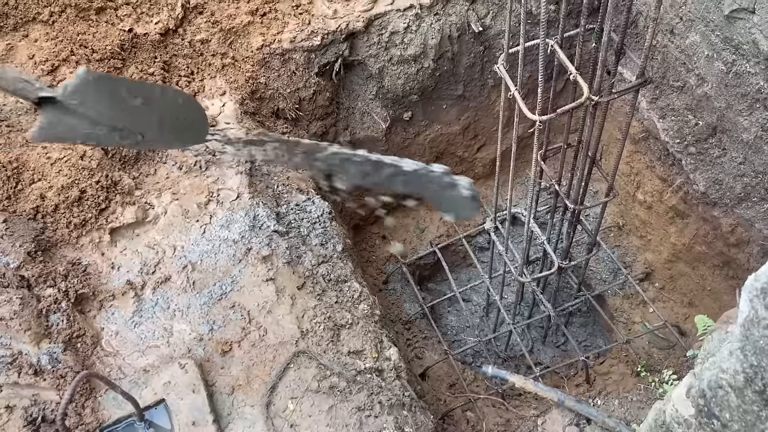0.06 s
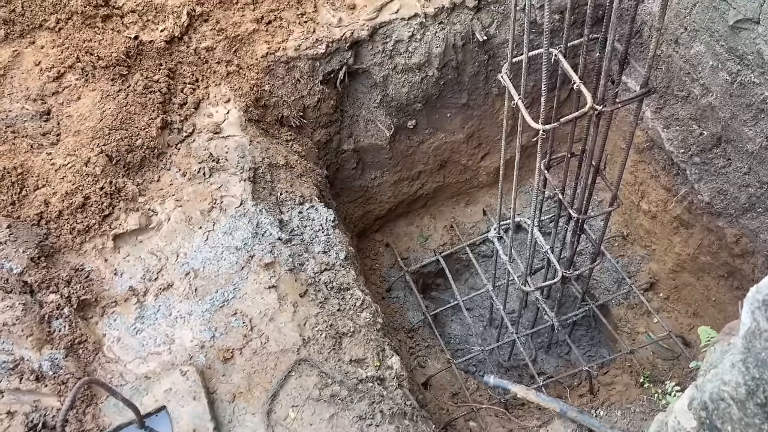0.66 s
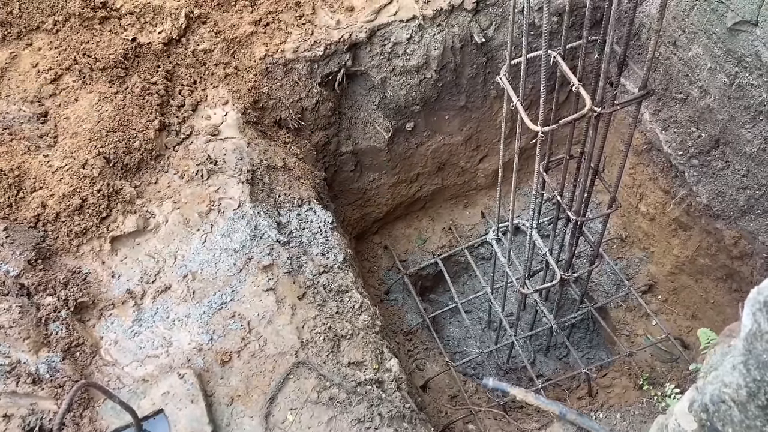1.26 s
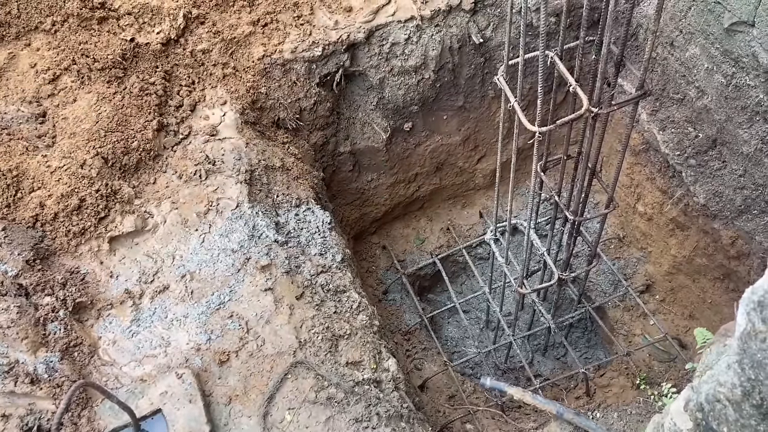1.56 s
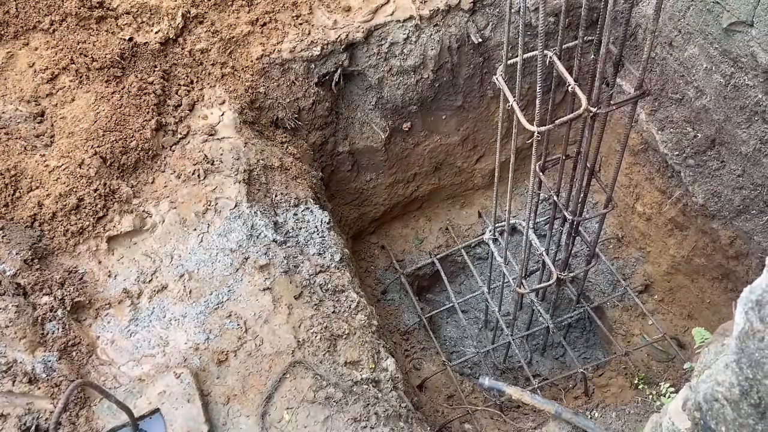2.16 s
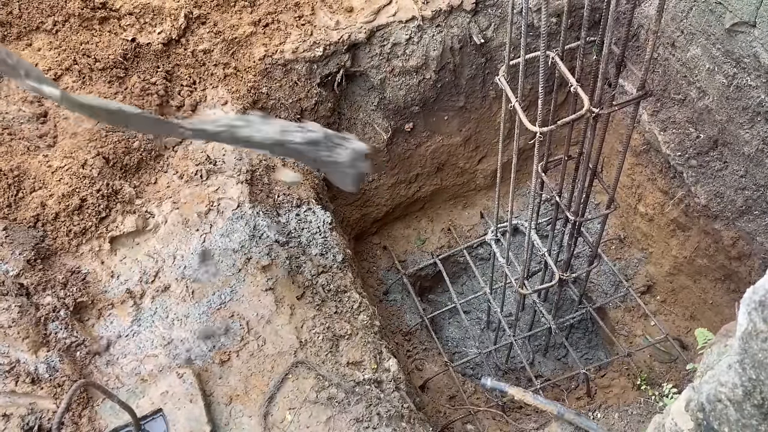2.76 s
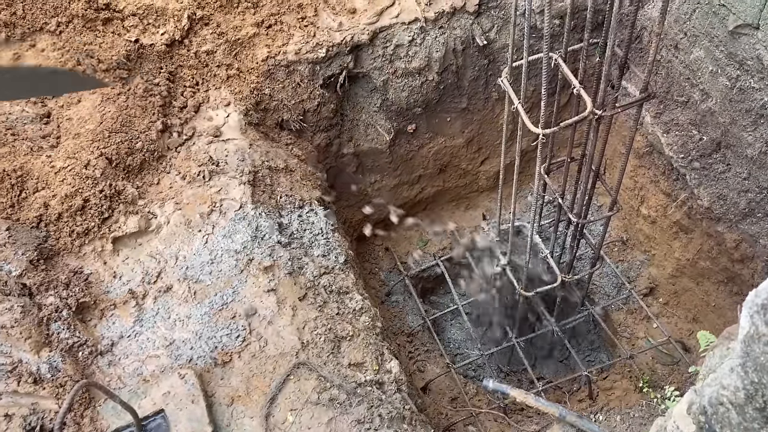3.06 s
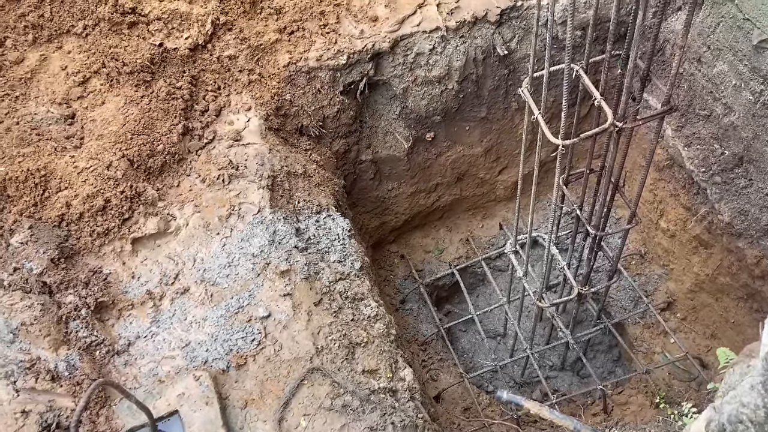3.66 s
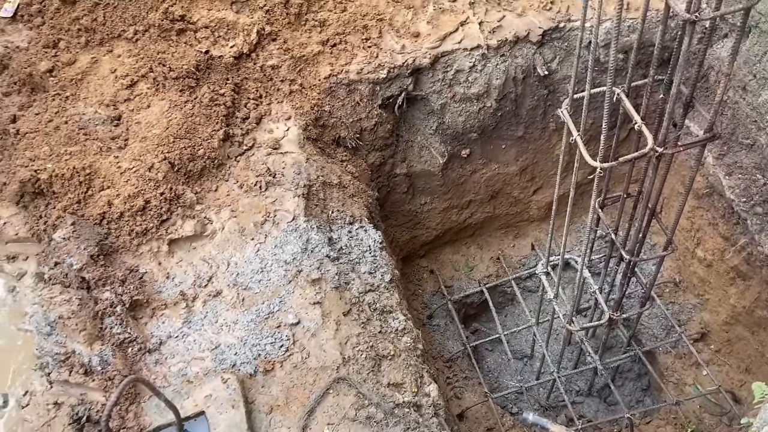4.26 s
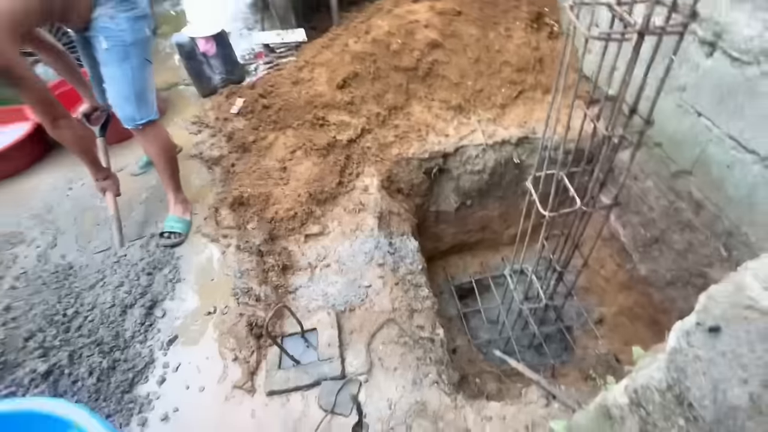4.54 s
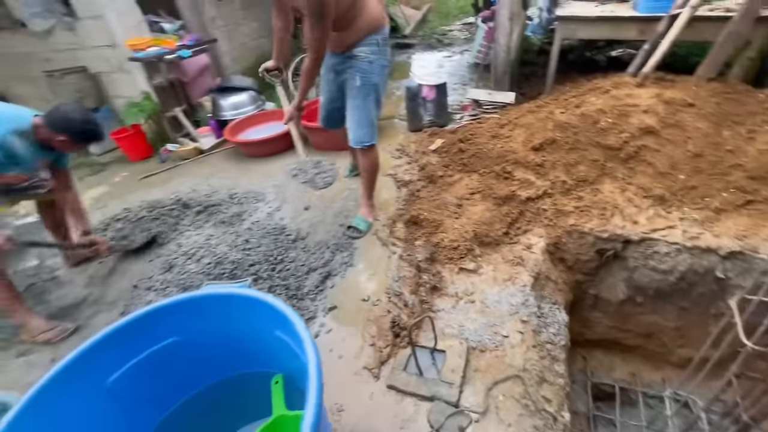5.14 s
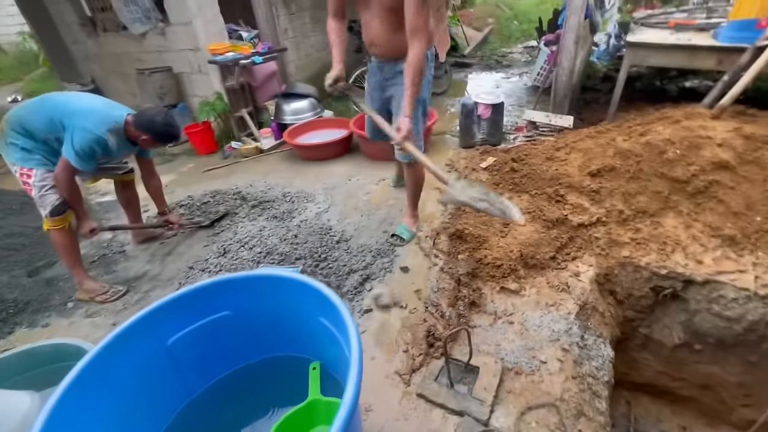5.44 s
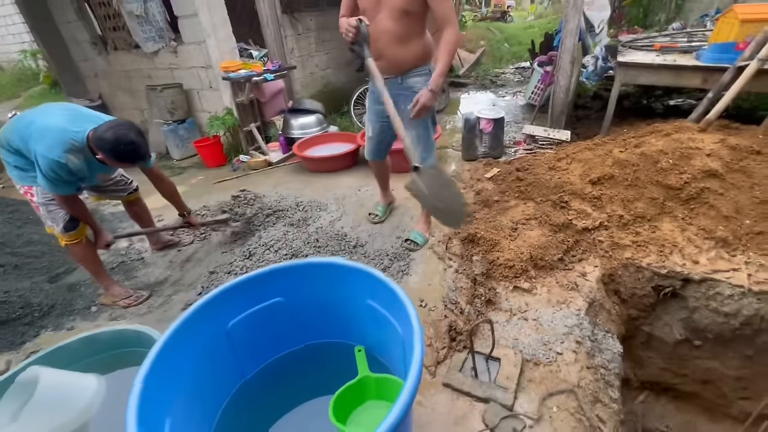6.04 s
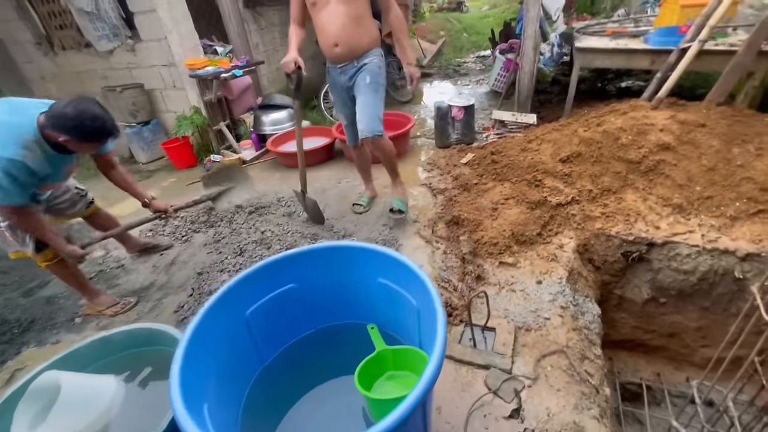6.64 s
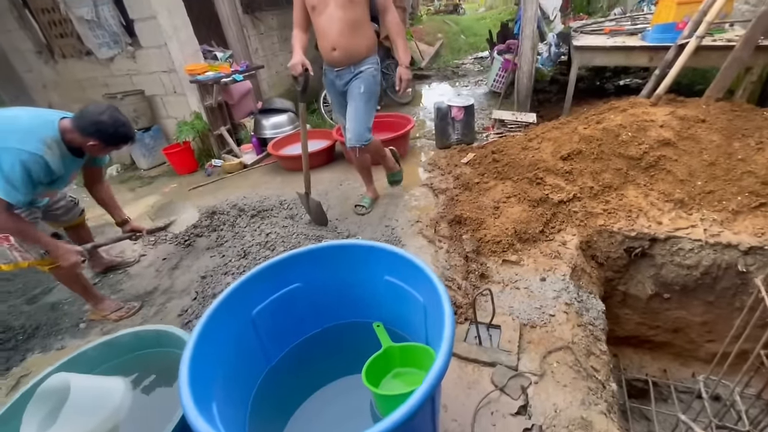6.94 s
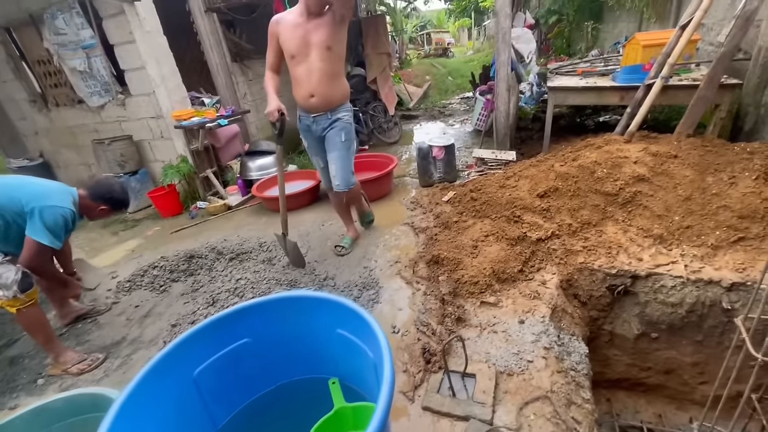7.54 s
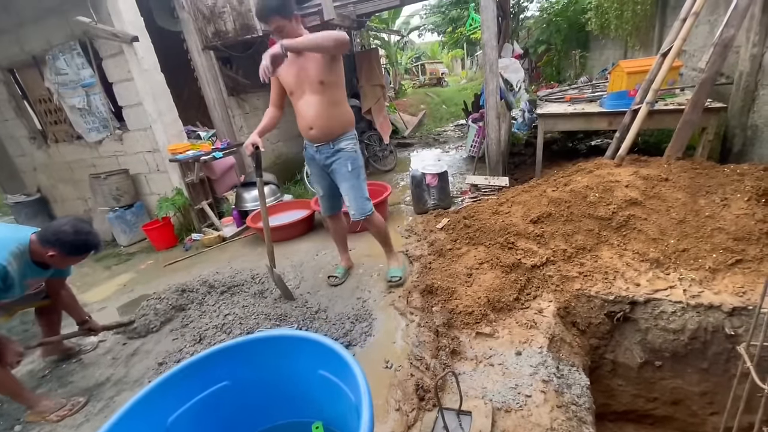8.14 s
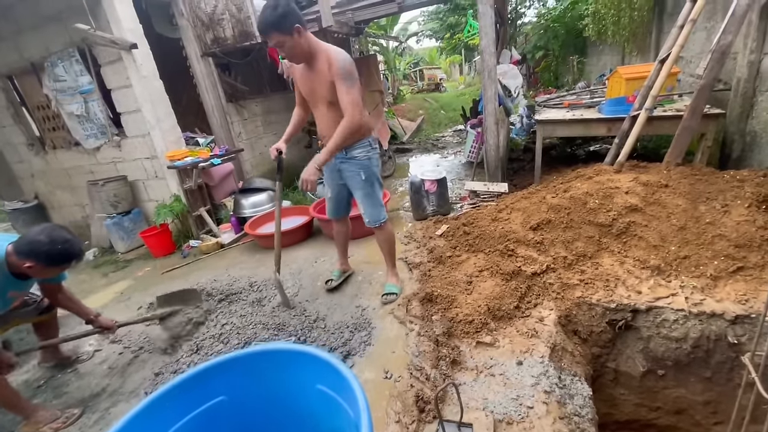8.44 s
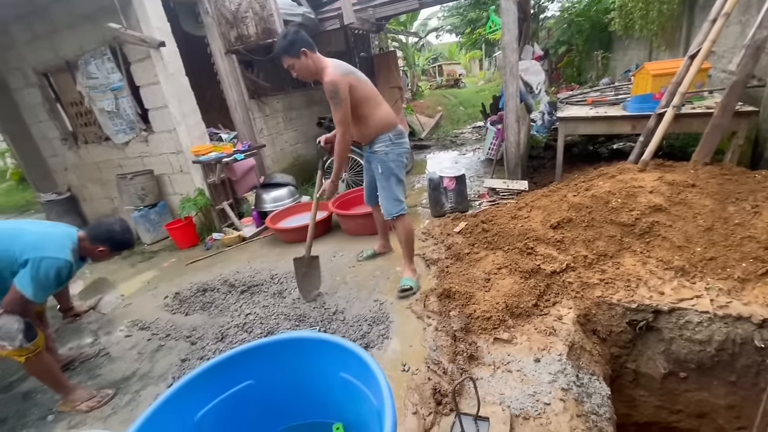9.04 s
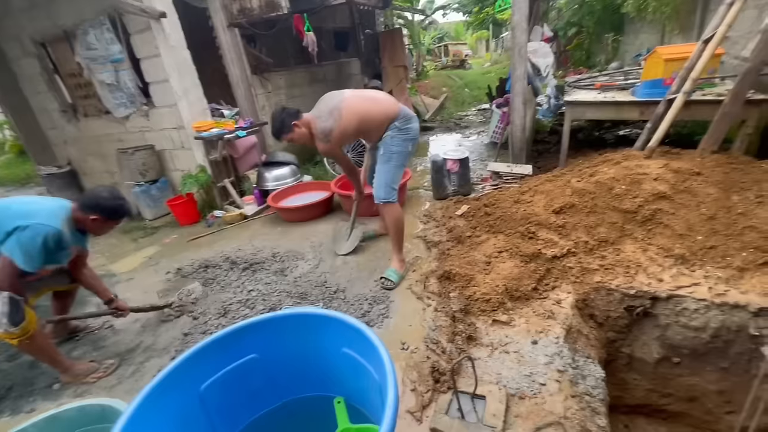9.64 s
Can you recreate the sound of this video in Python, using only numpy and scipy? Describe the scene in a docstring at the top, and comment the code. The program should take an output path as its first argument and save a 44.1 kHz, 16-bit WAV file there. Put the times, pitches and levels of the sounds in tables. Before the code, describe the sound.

Two steel shovels bite and grind through wet gravel concrete on a slab, mostly to the left, the blades ringing with grit. A load splatters into a pit at the start, another follows a few scoops later, and a softer one lands past the middle, each with a thud and pattering stones. More scraping and sharp chinks follow. The quiet walled yard adds a short echo and a faint low rumble.

```python
"""A quiet walled yard: two workers shovel wet gravel concrete on a slab, off to the left.
Steel blades bite and grind under the heap; catching grit rings the steel, and the mix slumps behind.
Loads are flung into a footing pit, where they thud, patter and spray; loose stones tick in between.
The walls answer each sound with a short tail, over a low rumble, faint air and two far whistles."""
import sys
import numpy as np
from scipy import signal
from scipy.fft import rfft, irfft, next_fast_len
from scipy.io import wavfile
from scipy.ndimage import uniform_filter1d, map_coordinates

SR = 44100
rng = np.random.default_rng(int(sys.argv[2]) if len(sys.argv) > 2 else 0)


def dump(signal):
    """Clip the signal to [-1, 1] and save it as 16-bit WAV at the path in sys.argv[1]."""
    limited = np.clip(np.atleast_2d(signal).T, -1, 1)
    pcm = np.round(limited * 32767).astype(np.int16)
    wavfile.write(sys.argv[1], SR, pcm)


N = 432180
THUD_HZ, LOW_HZ, MID_HZ, HIGH_HZ, TOP_HZ = 40, 250, 1100, 4200, 15850  # band edges

# steel resonances of the two shovels: (pitch [Hz], width [Hz], level [dB])
FILLING_BLADE = [(565, 146, -3), (790, 87, -2), (1054, 35, -6), (1225, 110, -8), (1640, 45, -3.5),
                 (2030, 83, -0.5), (2380, 59, -7), (2625, 90, -6.5), (3120, 69, -9), (3590, 48, -4)]
MIXING_BLADE = [(450, 197, 5.5), (790, 70, 1), (990, 100, -5.5), (1584, 69, 0.5), (1720, 85, 2.5),
                (1870, 68, -4), (3100, 320, -0.5), (3900, 64, -7), (5510, 200, -1.5), (6100, 100, -4),
                (6820, 170, 3)]
# tone of the grit rubbing on each shovel: (frequency [Hz], level [dB])
FILLING_COLOUR = [(100, -8.5), (150, -5), (220, -2), (320, -4.5), (410, -3), (560, 2), (1000, -1.5),
                  (1450, -0.5), (2000, 1), (2700, -2), (4500, -7), (7000, -6.5), (8500, -5), (16000, -11)]
MIXING_COLOUR = [(100, 0), (140, -4.5), (200, -5.5), (310, -4.5), (500, -2.5), (1200, -2), (1700, 0),
                 (3200, -2), (4300, -4), (6000, -1.5), (8500, -9), (11300, -11), (13000, -25)]


def amp(db):
    """Decibels to gain."""
    return 10 ** (np.asarray(db) / 20)


def along(points, hz):
    """Read a (frequency, value) curve on a log axis."""
    knots_hz, values = np.transpose(points)
    return np.interp(np.log(hz + 1), np.log(knots_hz + 1), values)


def wobble(n, rate):
    """A smooth random curve, rate knots a second."""
    return map_coordinates(rng.standard_normal(int(n * rate / SR) + 4), [np.arange(n) * rate / SR])


def filtered(x, response):
    """Shape x with a complex frequency response."""
    n = x.shape[-1]
    size = next_fast_len(n + 8192)
    return irfft(rfft(x, size) * response(np.fft.rfftfreq(size, 1 / SR)), size)[..., :n]


def band(x, lo, hi, order=4):
    """Causal band-pass."""
    return signal.sosfilt(signal.butter(order, [lo, min(hi, TOP_HZ)], "band", fs=SR, output="sos"), x)


def level_band(pair, lo, hi):
    """One band of a stereo texture, levelled so that its centre below 9 kHz holds rms 1."""
    part = band(pair, lo, hi)
    centre = filtered(part.mean(0), lambda hz: hz < 9000)
    return part / np.sqrt(np.abs(uniform_filter1d(centre ** 2, size=SR // 12)) + 1e-20)


def add(out, s, x):
    """Mix x into out at time s."""
    start = round(s * SR)
    x, start = x[:, max(-start, 0):], max(start, 0)
    out[:, start:start + x.shape[1]] += x[:, :N - start]


def ringing(modes, hz):
    """Causal response of (pitch, width, level) resonances."""
    return sum(amp(db) * 1j * hz * width / (pitch ** 2 - hz ** 2 + 1j * hz * width)
               for pitch, width, db in modes)


def grains(n, rate=2600, spread_db=6, clump_db=2.8, clump_rate=120):
    """Tiny stone contacts, rate a second, of scattered size and louder in clumps."""
    hit = rng.random(n) < rate / SR
    size_db = spread_db * np.clip(rng.standard_normal(n), -2, 2) + clump_db * wobble(n, clump_rate)
    return hit * amp(size_db) * rng.choice([-1, 1], n)


def burst(t, attack_s, t60):
    """Noise with a fast attack, dying 60 dB in t60 seconds."""
    return rng.standard_normal(len(t)) * np.minimum(t / attack_s, 1) * amp(-60 * t / t60)


def envelope(t, attack, hold, release, swell_db):
    """A quick attack, a swell that levels off at the end of the hold, then a 30 dB fall per release."""
    hold = max(hold, attack)
    db = -swell_db * np.clip(1 - t / hold, 0, 1) ** 2 - 30 * np.maximum(t - hold, 0) / release
    return np.minimum(t / attack, 1) * amp(db)


def wall_tail(x):
    """The walls answer with a stereo tail that keeps changing, as it does when a source moves."""
    # decay of the yard: (frequency [Hz], t60 [s])
    yard_decay = [(100, 0.29), (600, 0.19), (3000, 0.31), (12000, 0.2)]
    hop, n = SR // 16, len(x)
    count = n // hop + 2
    starts, span = np.arange(count)[:, None] * hop, np.arange(2 * hop)
    pieces = np.pad(x, (hop, 2 * hop))[starts + span] * np.sin(np.pi * span / (2 * hop))
    hz, t, noise = signal.stft(rng.standard_normal((3, count, 2 * hop)), SR, nperseg=256)
    apart = 0.75 * np.arctan(hz / 300)[:, None]  # long waves are alike on both sides
    diffuse = np.cos(apart) * noise[2] + np.sin(apart) * noise[:2]
    decay = amp(-60 * t / along(yard_decay, hz)[:, None])
    tails = signal.istft(diffuse * decay, SR, nperseg=256)[1]
    answers = signal.fftconvolve(pieces[None], tails / np.linalg.norm(tails[0, 0]), axes=2)
    when = (starts + np.arange(answers.shape[2])).ravel()
    return np.array([np.bincount(when, side.ravel())[hop:hop + n] for side in answers])


def placed(x, lead_ms, shadow_db, wet_db):
    """Set a sound in the yard: the left side hears it lead_ms earlier, the right side is shaded."""
    # shade of the microphone housing: (frequency [Hz], share of shadow_db [ratio])
    shade = [(200, 0), (700, 0.36), (2800, 0.016), (4000, 0.53), (5500, 0.79), (7200, 0.67), (8800, 0.05)]

    def direction(hz):
        lead = np.exp(1j * np.pi * hz * lead_ms / 1000 * np.array([[1], [-1]]))
        return lead * amp(np.outer([0, -shadow_db], along(shade, hz)))
    return filtered(x + amp(wet_db) * wall_tail(x), direction)


def yard_air(rumble_db, air_db):
    """The bed: a low distant rumble and faint air with stray ticks of settling gravel."""
    # tone of the quiet yard: (frequency [Hz], level [dB])
    yard_tone = [(20, -26), (35, -11), (52, 7.5), (75, -2), (130, -7), (300, -22.5), (700, -25),
                 (2000, -33), (5000, -32.5), (8000, -40), (11200, -24.5), (12500, -66)]
    colour = lambda hz: amp(along(yard_tone, hz))
    rumble = placed(filtered(rng.standard_normal(N), colour), lead_ms=0, shadow_db=0, wet_db=6)
    settling = rng.standard_normal(N) + grains(N, rate=100, spread_db=7, clump_db=2, clump_rate=6)
    air = placed(filtered(settling, colour), lead_ms=0.15, shadow_db=6, wet_db=5)
    return (amp(rumble_db + 1.5 * wobble(N, 9)) * level_band(rumble, 27, LOW_HZ)
            + amp(air_db + 0.8 * wobble(N, 9)) * level_band(air, LOW_HZ, TOP_HZ))


def far_whistles(fade_s=0.0033):
    """Thin distant tones that waver and sag in pitch."""
    # one contour per whistle: (time [s], pitch [Hz], level [dB])
    contours = [
        [(2.3, 850, -69), (2.5, 845, -63), (2.64, 840, -66)],
        [(6.68, 1710, -72), (6.8, 1704, -66), (7.0, 1707, -62.5), (7.25, 1665, -65), (7.5, 1613, -68),
         (7.6, 1600, -83)],
    ]
    out = np.zeros((2, N))
    for contour in contours:
        times, pitches, levels = np.transpose(contour)
        t = np.arange(times[0], times[-1] + fade_s, 1 / SR)
        gate = np.clip(np.minimum(t - t[0], t[-1] - t) / fade_s, 0, 1)
        hz = np.interp(t, times, pitches) * (1 + 0.008 * wobble(len(t), 80))
        tone = amp(np.interp(t, times, levels)) * np.sin(2 * np.pi * np.cumsum(hz) / SR)
        add(out, times[0], placed(gate * tone, lead_ms=0.054, shadow_db=10, wet_db=-6))
    return out


def crumbles():
    """A small cluster of stones shifts: a soft gritty swell with no hard edge."""
    # settling clusters: (crest [s], spread [s], level [dB], centre [Hz])
    clusters = [(.505, .014, -43.5, 3020), (2.271, .006, -37, 4000), (2.306, 0.0056, -41, 3000),
                (2.425, 0.015, -50, 3800), (2.52, .008, -42, 8000), (2.593, .009, -39.5, 3800),
                (3.405, .015, -38.5, 2600), (3.45, .015, -50, 1800), (3.618, .018, -42.5, 2000),
                (3.732, .008, -52, 900), (5.757, 0.01, -41, 4500), (5.81, .012, -45, 6000),
                (8.265, 0.0058, -37, 4000), (8.7, 0.0066, -49, 6000), (8.734, 0.0055, -48, 5000),
                (8.79, 0.015, -48, 3500), (9.072, .004, -50, 2700)]
    out, t = np.zeros((2, N)), np.arange(-SR // 10, SR // 10) / SR
    for s, spread, db, hz in clusters:
        grit = band(grains(len(t)), hz / 2, hz * 2, order=2)
        crumble = np.exp(-.5 * (t / spread) ** 2) * grit / grit.std()
        add(out, s + t[0], amp(db) * placed(crumble, lead_ms=0.046, shadow_db=7, wet_db=-6))
    return out


def slumps(edge_ratio=1.23, lumps_db=2.5, lump_rate=90):
    """The heap sags into the furrow behind the blade: a soft, dull swell that gives way in lumps."""
    # sags of wet mix: (crest [s], spread [s], level [dB], centre [Hz])
    sags = [(.735, .014, -40, 130), (.905, 0.021, -43, 160), (.91, .028, -42, 460),
            (1.245, 0.029, -28, 320), (1.29, .04, -35, 205), (1.57, .025, -47, 200),
            (1.61, 0.038, -42.5, 352), (1.73, .025, -49.5, 360), (4.2, .014, -32, 190),
            (4.28, .016, -31, 200), (4.33, 0.026, -28.5, 640), (8.04, .035, -43, 460),
            (8.13, .025, -37.5, 450), (8.16, .035, -42, 170), (8.195, .018, -37, 355),
            (9.37, .014, -37, 125)]
    out, t = np.zeros((2, N)), np.arange(-SR // 6, SR // 6) / SR
    for s, spread, db, hz in sags:
        mush = band(rng.standard_normal(len(t)), hz / edge_ratio, hz * edge_ratio, order=2)
        mush *= amp(lumps_db * wobble(len(t), lump_rate))
        swell = np.exp(-.5 * (t / spread) ** 2)
        mush = swell * mush / np.sqrt(np.average(mush ** 2, weights=swell ** 2))
        add(out, s + t[0], amp(db) * placed(mush, lead_ms=.35, shadow_db=6, wet_db=-7))
    return out


def stones(knock_t60, tick_t60, attack_s):
    """A single stone beds into the mix with a dull knock and a soft tick."""
    # stone landings: (time [s], level [dB], knock re midrange click [dB], tick re click [dB])
    landings = [(0.231, -9, 1.5, -2), (0.289, -9, 0, -8), (0.318, -14.5, 4, -3.5), (.375, -20, 5, -2),
                (0.434, -20, 5, 4), (.456, -29, 8, -4), (0.569, -30, 6, 3), (0.611, -22.5, 6, 2),
                (0.621, -22, 2, -2.5), (.977, -33, -3, -1), (2.401, -31, -14, 7), (2.5, -22.5, -10, 10),
                (2.613, -25, -4.5, -3), (2.722, -15, -12, 1.5), (3.03, -14, 10, -5), (3.055, -9, 7, -3),
                (3.113, -13.5, 1, -4), (3.176, -15.5, -2, -1), (3.259, -13.5, 8, -5), (3.336, -23, 4.5, -3),
                (3.516, -24, -10, 9), (4.945, -30, 1, 1), (5.392, -20.5, 10, 1.5), (5.446, -31, -4.5, -5),
                (5.682, -20, 7, 1.5), (5.743, -28, 7.5, 2), (5.965, -10, 1, -0.5), (6.045, -14, 6, 2),
                (6.186, -20.5, 9.5, -1.5), (6.936, -36.5, -1, 1), (7.218, -35, 12, -6.5),
                (7.383, -36, 5, 7.5), (8.175, -24, 0, 4.5), (9.515, -20, 7, -15.5)]
    out, t = np.zeros((2, N)), np.arange(SR // 6) / SR
    for s, db, knock_db, tick_db in landings:
        knock = amp(knock_db) * band(burst(t, attack_s, knock_t60), LOW_HZ, 1430, order=2)
        contact = burst(t, attack_s, tick_t60)
        click = band(contact, 1530, HIGH_HZ, order=2)
        tick = amp(tick_db) * band(contact, HIGH_HZ, TOP_HZ)
        blow = knock + click + tick
        add(out, s, amp(db) * placed(blow / np.abs(blow).max(), lead_ms=.03, shadow_db=5, wet_db=-9))
    return out


def clods(t60, push_share=0.59):
    """A lump of wet mix, or a shovel set down, lands with a dead thump: one clean push and a puff of noise."""
    # clod landings, and at 6.546 s the thud of a shovel set down: (time [s], level [dB], pitch [Hz])
    landings = [(.111, -23.5, 480), (0.291, -13, 1150), (0.296, -13, 290), (0.305, -21, 80),
                (0.328, -21.5, 400), (.523, -33.5, 480), (2.703, -30.5, 260), (2.88, -23.5, 160),
                (2.94, -26.5, 110), (2.955, -25, 280), (2.982, -21, 470), (3.03, -21, 200),
                (3.057, -17, 900), (3.066, -23, 79), (3.088, -28, 70), (3.125, -29, 130), (3.19, -27, 90),
                (3.261, -30, 182), (5.257, -30, 500), (5.396, -33.5, 178), (5.687, -30, 343),
                (5.863, -29, 564), (5.974, -23, 93), (6.053, -30, 90), (6.075, -27, 420),
                (6.189, -33.5, 202), (6.538, -28, 460), (6.546, -29, 111), (7.884, -28, 380),
                (7.891, -33, 130), (9.426, -17.5, 480), (9.428, -21, 800), (9.457, -21, 423)]
    out, t = np.zeros((2, N)), np.arange(SR // 5) / SR
    for s, db, hz in landings:
        puff = band(rng.standard_normal(len(t)) * amp(-60 * t / t60), hz * 0.69, hz * 1.66, order=2)
        cycles = hz * t
        push = np.sin(2 * np.pi * cycles) * 2 * cycles * np.exp(1 - 2 * cycles)
        thump = push_share * push + (1 - push_share) * puff / np.abs(puff).max()
        thump /= np.abs(thump).max()
        add(out, s, amp(db) * placed(thump, lead_ms=0.064, shadow_db=3, wet_db=-8.5))
    return out


def throws(shadow_db, wet_db, attack_s=0.0088, trickle_s=0.73):
    """A load showers the pit: the mass thuds, stones patter, slurry sprays, stragglers trickle."""
    # flung loads: (start [s], pour [s], release [s], patter [dB], thud [dB], splat [dB], spray [dB],
    # trickle re pour [dB], left lead [ms])
    loads = [(.104, 0.2, 0.2, -29, -36, -33.5, -29, -11.5, 0.0033),
             (2.635, 0.099, 0.18, -39.5, -46.5, -45.5, -38, -13, 0.0093),
             (2.93, 0.18, 0.36, -29, -36, -35, -29.5, -8, 0.011),
             (5.859, 0.21, .24, -33.5, -37, -39, -33, -14, -.16)]
    # tone of wet mix landing: (frequency [Hz], level [dB])
    wet_colour = [(30, -16), (60, 13), (100, 9.5), (150, 2.5), (220, 4), (330, 3.5), (550, 8), (1200, -5),
                  (3000, -5), (7000, -4), (8700, -1), (16000, 2.5)]
    shower_rate, straggler_rate, thinning_s = 1500, 750, .06  # rates in stones a second
    out, t = np.zeros((2, N)), np.arange(SR) / SR
    for s, pour, release, patter_db, thud_db, splat_db, spray_db, trickle_db, lead_ms in loads:
        rate = straggler_rate + shower_rate * np.exp(-np.maximum(t - pour, 0) / thinning_s)
        landings = grains(len(t), rate, spread_db=6.5, clump_rate=110)
        shower = filtered(landings, lambda hz: amp(along(wet_colour, hz)))
        shower = placed(shower, lead_ms, shadow_db, wet_db)
        bulk = envelope(t, attack_s, pour, release, swell_db=5.5)
        trickle = amp(trickle_db) * envelope(t, attack_s, pour, trickle_s, swell_db=5.5)
        weight = envelope(t, attack_s, pour, 0.69 * release, swell_db=19)
        thud = amp(thud_db) * weight * level_band(shower, THUD_HZ, LOW_HZ)
        splat = amp(splat_db) * level_band(shower, LOW_HZ, MID_HZ)
        patter = amp(patter_db) * level_band(shower, MID_HZ, HIGH_HZ)
        spray = amp(spray_db) * level_band(shower, HIGH_HZ, TOP_HZ)
        fade_out = 1 - t ** 8
        add(out, s, (thud + np.maximum(bulk, trickle) * (splat + patter + spray)) * fade_out)
    return out


def squeals(flutter_rate=170):
    """The edge chatters on one resonance of the blade, which bends ever faster as the load shifts."""
    # squeals of the steel: (start [s], length [s], from [Hz], to [Hz], level [dB])
    glides = [(1.12, .16, 2060, 2020, -28), (2.803, .05, 2450, 2150, -22), (9.338, .085, 1720, 1320, -27),
              (9.73, .08, 1540, 1750, -25)]
    out, t = np.zeros((2, N)), np.arange(SR // 3) / SR
    for s, length, from_hz, to_hz, db in glides:
        progress = np.minimum(t / length, 1)
        tone = np.exp(2j * np.pi * np.cumsum(from_hz + (to_hz - from_hz) * progress ** 2) / SR)
        grip = wobble(len(t), flutter_rate) + 1j * wobble(len(t), flutter_rate)
        squeal = np.sin(np.pi * np.sqrt(progress)) * (grip * tone).real
        add(out, s, amp(db) * placed(squeal, lead_ms=.42, shadow_db=5, wet_db=-5))
    return out


def strikes(t60, ring_db, attack_s):
    """The edge hits stone: a sharp chink and a short crunch that rings the steel."""
    # edge hits: (time [s], level [dB], clank in the blend [dB], chink in the blend [dB])
    hits = [(0.677, -13, -12, -5.5), (0.702, -10, -10, -9), (1.059, -20, -12, -6), (2.78, -7, -11, -8),
            (2.802, -1.5, -9, -7.5), (4.091, -11.5, -1.5, -8.5), (5.044, -1.5, -14.5, 1),
            (6.531, -13, -11.5, -10), (7.025, -31, -11, -11), (7.667, -11.5, -14, -5),
            (9.306, -10, -12, -7), (9.349, -18, 0, -20)]
    out, t = np.zeros((2, N)), np.arange(SR // 4) / SR
    for s, db, clank_db, chink_db in hits:
        crunch = burst(t, attack_s, t60)
        steel = filtered(crunch, lambda hz: 1 + amp(ring_db) * ringing(FILLING_BLADE, hz))
        clank = amp(clank_db) * band(steel, 680, HIGH_HZ, order=2)
        chink = amp(chink_db) * band(burst(t, attack_s, t60=.03), HIGH_HZ, TOP_HZ)
        blow = (clank + chink) / np.abs(clank + chink).max()
        add(out, s, amp(db) * placed(blow, lead_ms=0.376, shadow_db=3.5, wet_db=-5))
    return out


def hollow(pair, full_hz, lift_db, width=0.14, fill_s=0.11):
    """The hollow under the blade rings high when empty and sinks to full_hz as the scoop fills."""
    hz, t, spectrum = signal.stft(pair, SR, nperseg=1024)
    centre = full_hz * (1 + 0.55 * np.exp(-t / fill_s))
    gain = 1 + amp(lift_db) / (1 + ((hz[:, None] / centre - 1) / width) ** 2)
    return signal.istft(spectrum * gain, SR, nperseg=1024)[1][:, :pair.shape[1]]


def scrape(blade, boom, grind, hiss, hollow_hz, hollow_db, squeal_hz=None):
    """Grit catches under the sliding edge and rings the blade; three envelopes shape the bands."""
    # shovels by name: (resonances, colour, ring [dB], left lead [ms], right shade [dB], walls [dB])
    blades = {"fill": (FILLING_BLADE, FILLING_COLOUR, 2.5, 0.384, 5.3, 2.6),
              "mix": (MIXING_BLADE, MIXING_COLOUR, -0.93, .32, 13, 2.1),
              "ahead": (MIXING_BLADE, MIXING_COLOUR, -2.5, 0.19, 1.9, 0)}
    modes, colour, ring_db, lead_ms, shadow_db, wet_db = blades[blade]
    if squeal_hz:  # where the edge bears, nearby resonances sing out by up to 5 dB
        modes = [(hz, width, db + 5 * np.exp(-(np.log2(hz / squeal_hz) / .2) ** 2))
                 for hz, width, db in modes]
    n = len(grind)
    catches = grains(n)
    ring = filtered(catches, lambda hz: ringing(modes, hz))
    drift = np.cumsum(0.012 * wobble(n, 25))  # the shifting load detunes the steel
    ring = map_coordinates(ring, [np.arange(n) + drift], order=1)
    steel = filtered(catches + amp(ring_db) * ring, lambda hz: amp(along(colour, hz)))
    pair = hollow(placed(steel, lead_ms, shadow_db, wet_db), hollow_hz, hollow_db)
    return (boom * level_band(pair, 101, MID_HZ) + grind * level_band(pair, MID_HZ, HIGH_HZ)
            + hiss * level_band(pair, HIGH_HZ, TOP_HZ))


def drags(judder_db=1.26, judder_rate=35.8, run_up_s=.3):
    """A flat blade gathers speed through the mix, catches and slips, and slows again, with no bite."""
    # sliding strokes: (blade, crest [s], 20 dB rise [s], 20 dB fade [s], grind [dB], boom [dB],
    # hiss [dB], hollow [Hz])
    strokes = [("fill", .01, .05, .17, -49, -62, -43, 570),
               ("fill", 1.53, 0.16, 0.066, -53.5, -41, -57, 500),
               ("fill", 1.57, .08, 0.31, -50, -55, -55, 400), ("fill", 1.9, .23, 0.31, -44, -53, -45, 520),
               ("fill", 2.04, .24, 0.35, -49, -58.5, -43, 580),
               ("fill", 2.29, 0.065, 0.11, -50.5, -59.5, -45.5, 610),
               ("fill", 2.53, 0.27, 0.37, -62, -65, -50, 490),
               ("fill", 4.085, .2, 0.12, -43, -46.5, -42.5, 670),
               ("mix", 4.58, .15, 0.17, -51.5, -44, -57, 444),
               ("mix", 4.88, 0.36, 0.51, -53.5, -62.5, -52.5, 510),
               ("mix", 5.35, .16, 0.23, -50.5, -51, -53.5, 620), ("mix", 5.57, .1, .18, -40, -47, -41, 750),
               ("ahead", 6.51, .2, 0.12, -37, -49, -40, 880),
               ("mix", 7.66, 0.078, .05, -43, -41.5, -40, 520),
               ("mix", 7.99, 0.21, 0.29, -46.5, -42, -45.5, 395),
               ("mix", 8.17, .16, .2, -44.5, -39, -42.5, 390),
               ("mix", 8.5, 0.37, 0.24, -45.5, -48, -46, 460),
               ("mix", 8.85, 0.18, 0.28, -57.5, -55, -58, 560),
               ("mix", 9.0, 0.15, 0.19, -54, -57, -63, 1100), ("mix", 9.305, .014, .04, -41, -50, -41, 700),
               ("mix", 9.6, 0.38, 0.68, -35.5, -39.5, -36, 420)]
    out, t = np.zeros((2, N)), np.arange(3 * SR // 4) / SR - run_up_s
    for blade, crest, rise, fade, grind_db, boom_db, hiss_db, hollow_hz in strokes:
        arc_db = -20 * np.maximum(-t / rise, t / fade) ** 1.24
        speed = amp(arc_db + judder_db * wobble(len(t), judder_rate)) * signal.windows.tukey(len(t), .1)
        boom, grind, hiss = amp(boom_db) * speed, amp(grind_db) * speed, amp(hiss_db) * speed
        add(out, crest - run_up_s, scrape(blade, boom, grind, hiss, hollow_hz, hollow_db=6.5))
    return out


def digs(bite_s=0.0039, hollow_db=1.5):
    """The edge bites brightly, then booms and darkens as the blade fills and comes to rest."""
    # thrusts into the heap: (blade, start [s], push [s], release [s], swell [dB], full after [s],
    # grind [dB], boom [dB], hiss [dB], hollow [Hz], squeal [Hz])
    thrusts = [("fill", .699, .115, .17, 4.8, .125, -25, -32.5, -27.5, 640, 1640),
               ("fill", 1.077, 0.18, .175, 6, .225, -24.2, -24.8, -28.5, 510, 2020),
               ("fill", 2.78, .008, 0.038, 1, 0.0092, -25, -39, -26, 500, 2020),
               ("fill", 2.802, 0.018, 0.21, 0, 0.065, -20, -31.5, -23.5, 500, 2300),
               ("fill", 4.088, .02, 0.12, 0, 0.021, -29.5, -30.5, -31.5, 520, 800),
               ("fill", 4.138, .135, .19, 1.5, .13, -27.5, -23, -30.5, 515, 800),
               ("mix", 5.044, 0.072, .22, 0, 0.15, -27.5, -32.5, -23, 860, 940),
               ("ahead", 6.527, 0.011, 0.087, 1, .03, -30, -40, -34, 650, 3000),
               ("ahead", 7.028, 0.018, 0.29, 5, 0.058, -55, -56, -58, 500, 1720),
               ("mix", 7.538, 0.018, .4, 0, .12, -49, -50, -47, 450, 3100),
               ("mix", 7.664, 0.13, 0.25, 3, .13, -32.5, -36, -34, 440, 3100),
               ("mix", 9.306, 0.052, .36, 2.6, .13, -32, -32.5, -31, 390, 1720),
               ("mix", 9.724, 0.073, .2, 4.4, .1, -23.5, -31, -28, 1080, 1720)]
    out, t = np.zeros((2, N)), np.arange(2 * SR // 3) / SR
    for (blade, s, push, release, swell_db, full,
         grind_db, boom_db, hiss_db, hollow_hz, squeal_hz) in thrusts:
        boom = amp(boom_db) * envelope(t, bite_s, full, 0.95 * release, swell_db=12.5)
        grind = amp(grind_db) * envelope(t, bite_s, push, release, swell_db)
        hiss = amp(hiss_db) * envelope(t, bite_s, push - 0.016, release, swell_db)  # stops first
        add(out, s, scrape(blade, boom, grind, hiss, hollow_hz, hollow_db, squeal_hz))
    return out


def scene():
    """Single blows, shovel strokes and flung loads over the quiet of the yard."""
    blows = strikes(t60=0.1, ring_db=0.5, attack_s=.0017)
    landings = stones(knock_t60=0.038, tick_t60=0.046, attack_s=.0009) + clods(t60=0.055)
    shovelling = digs() + drags() + slumps() + squeals()
    gravel = throws(shadow_db=7.5, wet_db=0.5) + crumbles()
    background = yard_air(rumble_db=-53, air_db=-59.5) + far_whistles()
    return blows + landings + shovelling + gravel + background


def record(dry):
    """Around 10 kHz both sides carry the same treble; the top falls away and peaks round off."""
    # treble tone, a peak near 10 kHz, a steep fall and a faint sizzle near 15 kHz:
    # (frequency [Hz], gain [dB])
    treble_tone = [(8500, 0), (9400, -1), (10300, 3.5), (11200, 1), (12200, -8.5), (13200, -19),
                   (14200, -38), (15200, -20), (15850, -42)]
    low_cut_hz, ceiling = 33, .88
    blend = lambda hz: np.interp(hz, [7600, 8600, 12300, 13500], [0, np.pi / 2, np.pi / 2, 0])
    # across the shared band the right side turns one cycle against the left
    turn = lambda hz: np.exp(2j * np.pi * np.interp(hz, [8750, 11750], [0, 1]))
    left, right = dry
    shared_treble = filtered(left, lambda hz: np.sin(blend(hz)) ** 2 * turn(hz))
    right = filtered(right, lambda hz: np.cos(blend(hz))) + shared_treble
    pair = band(np.array([left, right]), low_cut_hz, TOP_HZ)
    heard = filtered(pair, lambda hz: amp(along(treble_tone, hz)))
    rounded = heard / (1 + np.abs(heard / ceiling) ** 6) ** (1 / 6)
    return filtered(rounded, lambda hz: hz < TOP_HZ)


dry = scene()
out = record(dry)
dump(out)
```